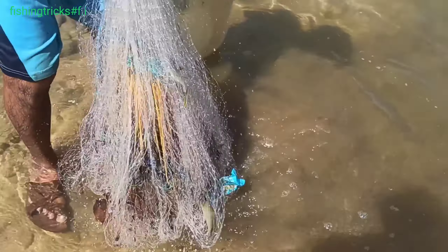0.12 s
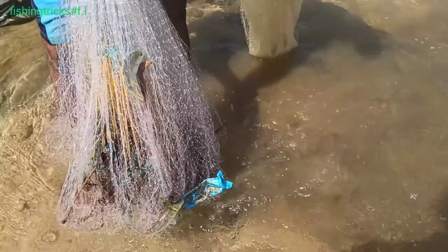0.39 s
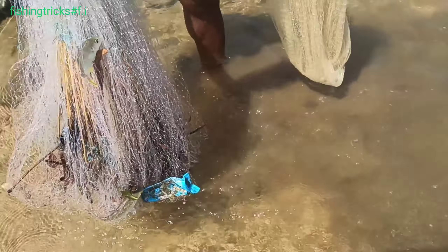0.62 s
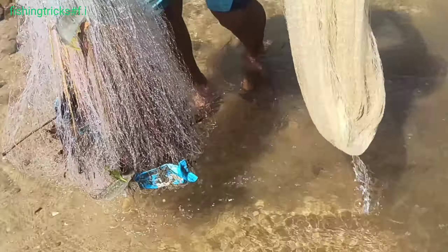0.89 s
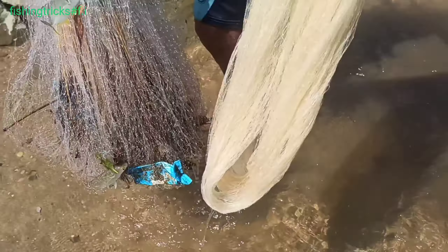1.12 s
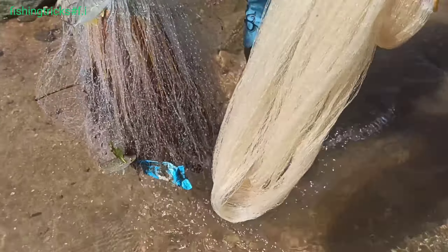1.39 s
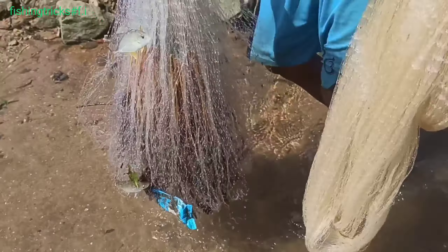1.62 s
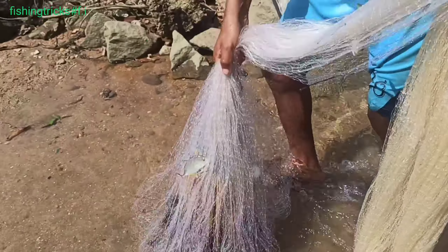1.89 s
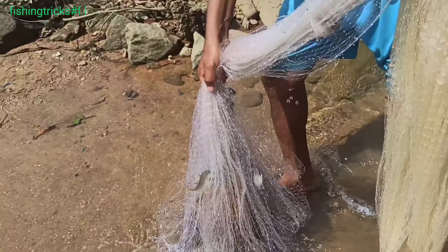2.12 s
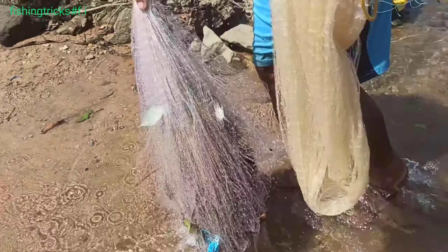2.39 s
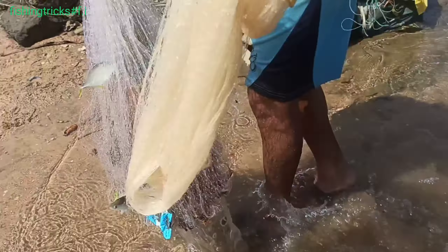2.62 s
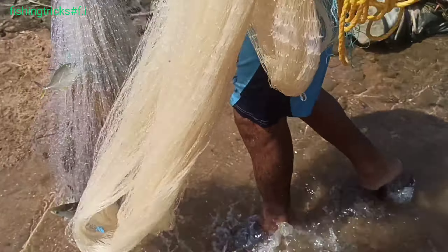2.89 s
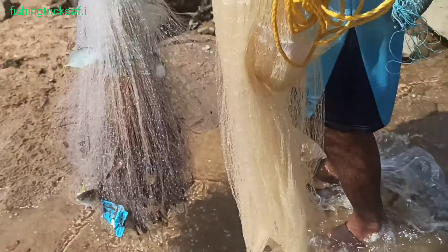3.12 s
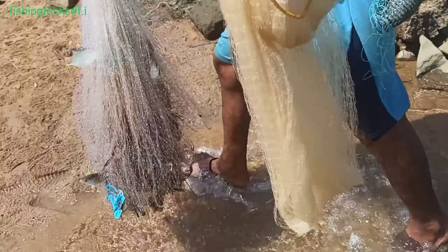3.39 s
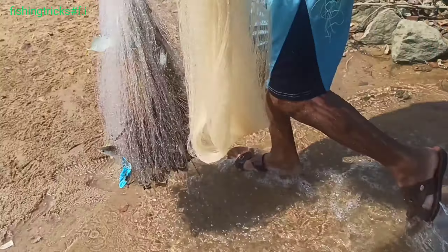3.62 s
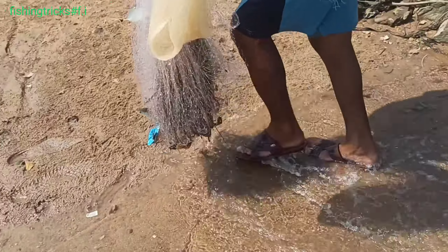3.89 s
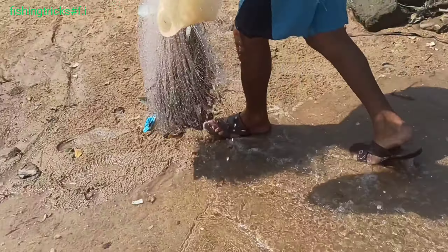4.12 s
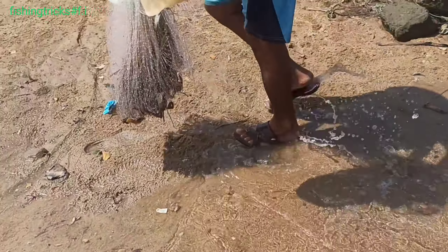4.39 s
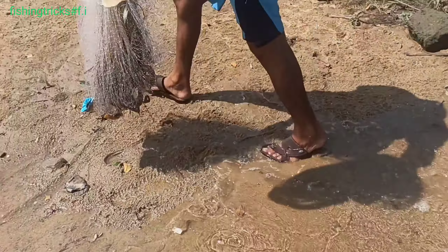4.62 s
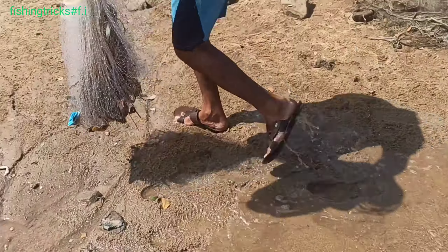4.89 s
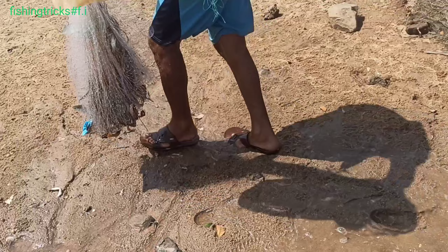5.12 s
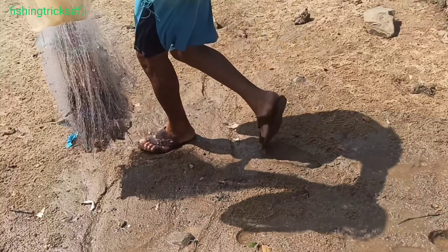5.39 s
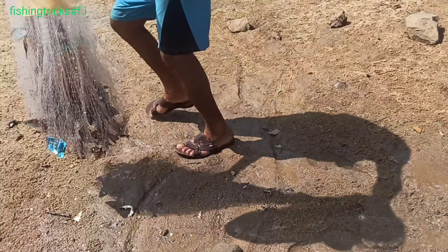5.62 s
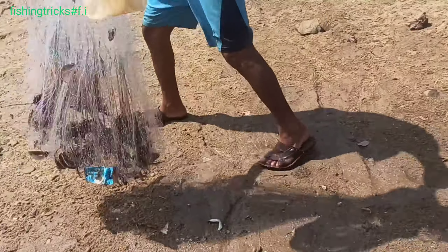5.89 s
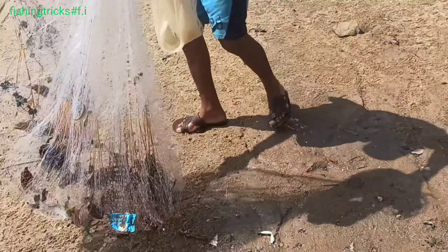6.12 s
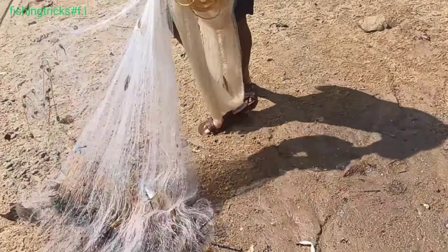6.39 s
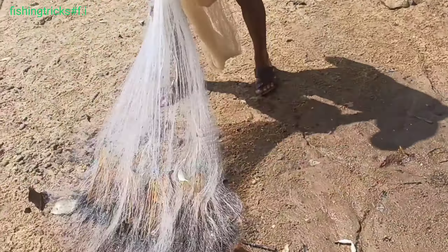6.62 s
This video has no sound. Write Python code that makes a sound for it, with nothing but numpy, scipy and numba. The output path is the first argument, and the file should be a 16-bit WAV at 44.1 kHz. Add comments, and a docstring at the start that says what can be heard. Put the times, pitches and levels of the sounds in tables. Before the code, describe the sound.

A close, bright stereo outdoor sound of a wet net leaving shallow water. From 0 to 1 second, thin trickle and spray, small ringing drops, a few sharp wet slaps and low wind thumps, mostly on the left. The water dips near 0.7, then swells into bubbly sloshing around 1.1 to 1.6. Between 1.7 and 2.5, heavy wind buffeting rumbles while splats and knocks break through. From 2.8 to 3.6, fuller wading splashes, gurgling bubbles rising in pitch, and spray leaning left. At 3.7 to 4.5, very hard short clacks and knocks, some on the right, with bright sandal slaps and quick splash surges. Around 5 to 5.3, more gliding bubbles and slosh, then thinner water with slaps at 5.7 and 6.1 to 6.2. From about 6.3 to 6.6, grainy mesh swishes and dull hem pats land on mud; last bubbles blip upward before 6.8.

```python
"""Wet net up a muddy bank

A wet fishing net is carried out of shallow water and up a muddy bank, close to a small stereo microphone.
Swarms of ringing bubbles make the slosh of wading feet, the splash, the fine spray and a thin top hiss.
Single ringing tones make drops, clacks, knocks and low thumps; some bubbles glide up in pitch.
Bursts of noise make sandals slapping the mud, the mesh swishing and the hem of the net clattering down.
Low noise, separate in each microphone port, makes the rumble of the wind."""
import sys
import numpy as np
from scipy import signal
from scipy.fft import rfft, irfft, next_fast_len
from scipy.io import wavfile
from numba import njit

SR = 44100
rng = np.random.default_rng(int(sys.argv[2]) if len(sys.argv) > 2 else 0)


def to_wav(s):
    """Save 16-bit WAV."""
    ch = np.atleast_2d(s).T  # columns
    pcm = np.round(np.clip(ch, -1, 1) * 32767)  # PCM
    wavfile.write(sys.argv[1], SR, pcm.astype(np.int16))


def invert_db(x):
    """Field ratio 10**(x/20) for x, a level in decibels (scalar or array-like)."""
    u = np.asarray(x, float) / 20
    return 10 ** u


N = 298192   # length in samples

# In all tables, left-right/dB is how much stronger the left port is than the right.
# Moving water, before surges: t/s, slosh level/dB, middle slosh pitch f/Hz, splash level/dB, spray level/dB
WATER = [(0.0, -41.5, 733, -37, -39.5), (0.22, -42, 920, -36.5, -35.5), (0.42, -44.5, 798, -46.5, -46.5),
         (0.66, -54, 588, -46, -45), (0.84, -49.5, 796, -48.5, -47.5), (1.13, -37, 934, -36, -37),
         (1.42, -33.5, 836, -31, -31), (1.65, -40, 666, -42, -44.5), (2.1, -38, 536, -34, -36.5),
         (2.43, -41, 704, -45.5, -43.5), (2.83, -30, 745, -29.5, -33.5), (3.02, -35.5, 730, -34, -35.5),
         (3.08, -31.5, 704, -34.5, -36.5), (3.5, -34, 635, -32.5, -34.5), (3.78, -38, 626, -37, -39.5),
         (4.1, -36, 687, -35.5, -35), (4.48, -34, 673, -33, -37), (4.74, -38, 867, -31.5, -35),
         (4.8, -39.5, 795, -37, -42), (4.97, -45.5, 714, -45.5, -46), (5.05, -33, 692, -42, -50),
         (5.13, -36.5, 703, -41.5, -39.5), (5.27, -35.5, 698, -34.5, -43.5), (5.65, -46.5, 821, -37.5, -43),
         (6.08, -48.5, 750, -47, -46), (6.36, -41.5, 836, -33.5, -34), (6.57, -41, 843, -33.5, -35.5),
         (6.61, -51, 870, -38, -42.5), (6.75, -43, 785, -35, -41.5)]
# Side of the splash, spray and hiss: t/s, left-right/dB, level of the top treble band against the spray/dB
SPRAY_PLACE = [(0.0, 0, -5.5), (1.41, 2, -6.5), (1.96, 3.5, -3.5), (2.4, 5.5, -9.5), (2.9, 6.5, -10.5),
               (3.55, 6.5, -11), (3.7, 0.5, -4), (4.2, -2, -6), (4.94, 3.5, -8), (5.21, 3, -5),
               (5.5, 1, -5), (6.1, 0.5, -8.5), (6.75, 0.5, -4.5)]
# Short splashes as a foot or the net hits the water: crest t/s, swell level/dB, fall time/s
SURGES = [(0.73, 4.5, 0.45), (1.801, 7, 0.11), (2.059, 6, 0.054), (3.346, 7.5, 0.069), (3.71, 4.5, 0.062),
          (3.85, 9.5, 0.057), (4.01, 9, 0.047), (5.24, 4.5, 0.032), (5.81, 7.5, 0.05), (6.39, 3.5, 0.076),]
SURGE_RISE_S = 0.059
SLOSH_SHARE = 0.69   # share of the swell in dB that the slosh takes
# Spectrum of water and splats through the microphone: f/Hz, level per Hz/dB
WATER_COLOUR = [(200, 16), (330, 9.5), (500, -1.5), (760, 2), (1100, 1), (1600, 0.5), (2500, -2), (4300, 2),
                (5000, -5), (5900, -5.5), (6500, 2), (7500, 1.5), (8400, -7.5), (11500, -10), (15500, -20)]
# Balance of the two ports for water and splats: f/Hz, left-right/dB
PORT_BALANCE = [(60, 2), (150, -0.5), (380, -5), (950, 2), (2380, -8), (5980, 3.5), (15000, -1)]

# Gusts on the ports: full strength t/s, hold/s, level at the port that is hit/dB, left-right/dB
GUSTS = [(0.094, 0.039, -27.5, 26), (0.24, 0.017, -33, 7), (0.61, 0.035, -30, -17),
         (0.72, 0.024, -25.5, 33), (0.907, 0.026, -31, -6), (1.09, 0.049, -31, 17), (1.695, 0.055, -24, 25),
         (1.842, 0.17, -23.5, 3.5), (1.95, 0.46, -22.5, 23), (3.1, 0.047, -34.5, 26),
         (3.485, 0.18, -34.5, 23), (3.82, 0.32, -32.5, -26), (4.425, 0.11, -26, 13),
         (6.402, 0.062, -36, -6)]
CALM_DB, GUST_RISE_DB_PER_S, GUST_FALL_DB_PER_S = -44.5, 151, 127

# Slaps and splats that throw spray: t/s, bright level/dB, left-right/dB, dull level against the bright/dB
SPLATS = [(0.0718, -16, -1, -30), (0.5278, -19, 1, -19), (1.126, -26.5, 9, 1), (1.816, -24, -3, -5),
          (1.937, -18.5, -1, -9), (2.031, -23.5, 2, -4), (2.151, -23.5, 0, -22), (2.3718, -22.5, 5, -26),
          (2.4593, -23.5, 4, -22), (2.635, -23.5, 9, -0.5), (3.179, -22.5, 3, -20), (3.462, -20, 7, -13),
          (3.796, -13.5, -7, -40), (3.993, -15.5, 2, -21), (4.664, -21.5, 7, -1), (5.7166, -19, 3, -7.5),
          (5.7739, -28, 3, 0), (6.1256, -17.5, 4, -7.5), (6.2274, -21, 4, -28)]
SPLAT_T60_S, SPLAT_RISE_S = 0.03, 0.00053

# Levels of the single tones below are those at the nearer port, before the onset swell and decay.
# Single drops, trapped bubbles and wet clacks: t/s, level/dB, f/Hz, time to fall 60 dB/s, left-right/dB
PLOPS = [(0.138, -24, 773, 0.077, -3.5), (0.269, -25, 1510, 0.046, -1), (0.351, -34, 1140, 0.045, 2),
         (0.4017, -18, 2090, .018, -4), (0.4707, -25.5, 1890, 0.035, -1), (0.524, -27, 2000, 0.026, -1),
         (0.5715, -21.5, 2670, 0.028, -14), (0.6455, -12.5, 2820, 0.012, -14),
         (0.6776, -25.5, 1950, 0.05, -10), (0.6902, -17, 2010, .024, 4), (0.8408, -21.5, 1660, 0.033, -3.5),
         (0.87, -28.5, 1370, 0.079, 3), (0.895, -28.5, 1610, 0.073, -2), (1.006, -20, 2140, 0.028, 0.5),
         (1.062, -22.5, 1050, 0.03, 0), (1.085, -17.5, 1034, 0.04, 3), (1.1272, -18.5, 1048, 0.087, 2),
         (1.1943, -18, 690, 0.037, -2), (1.228, -15.5, 2650, 0.04, -8), (1.273, -19.5, 666, 0.059, 1.5),
         (1.3246, -15, 3270, 0.013, 2), (1.428, -18.5, 820, 0.027, -2), (2.444, -20, 686, 0.03, -2.5),
         (2.472, -16.5, 1910, 0.014, 5), (2.566, -22.5, 343, 0.067, -1), (2.596, -11.5, 900, 0.0059, 1),
         (2.8074, -28, 426, 0.15, -3), (2.843, -15.5, 686, 0.027, 2), (2.97, -19.5, 945, 0.029, 7),
         (3.0505, -13, 740, 0.016, 1), (3.067, -15, 780, 0.015, -1), (3.16, -17, 525, 0.028, 0),
         (3.235, -23.5, 429, 0.17, -1), (3.3368, -9, 800, 0.0076, 3), (3.337, -16, 1246, 0.059, 16),
         (3.3684, -7, 3700, 0.0056, 8), (3.388, -24, 362, 0.23, -1), (3.7966, 21.5, 2470, 0.0015, -11),
         (3.996, -12.5, 3010, 0.017, -5), (4.0327, -8, 2800, 0.01, -11), (4.453, -18.5, 682, 0.083, -6),
         (4.6655, -0.5, 2520, 0.0037, -9), (4.7611, -8, 1750, 0.0041, -4), (4.8539, -20.5, 2710, .012, -10),
         (5.2315, -27, 306, 0.15, -1), (5.329, -14.5, 2670, 0.019, -17), (5.438, -12.5, 2780, 0.008, -3),
         (5.526, -25.5, 1370, 0.043, -2), (5.947, -26.5, 2070, 0.02, -8), (5.993, -29, 800, .04, 4),
         (6.2183, -24.5, 2070, 0.023, -14), (6.2288, -5.5, 3970, 0.0034, -12)]
# Knocks close to the right port: t/s, level/dB, f/Hz, time to fall 60 dB/s
KNOCKS = [(1.941, -9, 380, 0.033), (3.712, 1, 590, 0.0059), (3.735, 0.5, 404, 0.008),
          (3.8575, -4, 860, 0.014), (3.8754, 6, 1390, 0.0022), (4.145, 13.5, 318, 0.0027),
          (4.4967, 1, 360, 0.0088), (4.5348, 10.5, 1400, 0.0014), (5.165, -10.5, 3030, 0.0033),
          (6.1279, -1, 4270, 0.00071)]
KNOCK_PAN_DB = -32
# Single low thumps of air, stronger on one port: t/s, level/dB, f/Hz, left-right/dB
THUMPS = [(0.141, -2, 125, 32), (0.584, -15, 147, -20), (0.742, -5, 124, 24), (1.058, -14.5, 108, 19),
          (1.85, -9, 109, 7), (2.005, -8, 121, 10), (2.054, -8, 208, 14), (2.242, -7, 148, 19),
          (2.51, -8.5, 85, 29)]
THUMP_T60_S = 0.054
# Bubbles gliding up towards the surface: t/s, level/dB, birth f/Hz, f halfway through the ring/Hz,
# time to fall 60 dB/s
GLIDERS = [(.163, -29, 1250, 1550, 0.047), (0.28, -27, 1230, 1570, 0.085), (.302, -26, 2250, 2600, 0.029),
           (.404, -21.5, 2310, 3180, 0.017), (.451, -31, 1230, 1890, 0.04), (0.914, -35, 1710, 1790, 0.14),
           (1.012, -25, 650, 990, 0.054), (1.142, -22, 695, 740, 0.065), (1.166, -23, 930, 1040, 0.092),
           (1.296, -14, 500, 600, 0.026), (1.395, -26.5, 560, 845, 0.12), (1.395, -12.5, 3480, 3530, 0.011),
           (1.498, -19, 735, 790, 0.034), (2.0686, 3.5, 710, 970, 0.014), (2.749, -18, 980, 1250, 0.031),
           (3.115, -18, 570, 794, 0.062), (3.19, -18.5, 327, 350, 0.09), (3.26, -20, 520, 864, 0.11),
           (3.398, -18, 636, 765, 0.048), (3.52, -26.5, 321, 357, 0.22), (4.74, -20, 677, 724, .04),
           (5.014, -22.5, 1300, 2520, 0.027), (5.033, -18.5, 624, 1040, 0.044),
           (5.048, -22, 570, 754, 0.056), (5.225, -19, 577, 637, 0.044), (5.262, -14, 633, 895, 0.061),
           (5.311, -24, 2320, 2630, 0.021), (6.105, -26.5, 655, 950, .045), (6.278, -22, 500, 860, 0.044),
           (6.659, -25.5, 1310, 1350, .03), (6.702, -23, 1217, 1330, 0.044),
           (6.715, -11.5, 1580, 2700, 0.012), (6.742, -17, 526, 610, 0.02)]

# The mesh swishes over the mud: t/s, level before the grain/dB
SWISH = [(6.24, -71), (6.38, -33), (6.44, -40), (6.58, -41), (6.6, -70)]
SWISH_HZ = 3670   # middle of the band
# The hem of the net clatters down on the mud: t/s, level before the left-right split/dB
HEM_TICKS = [(6.342, -28), (6.434, -25), (6.443, -27), (6.469, -25), (6.483, -23), (6.519, -23),
             (6.559, -22.5), (6.581, -24.5)]
HEM_T60_S, HEM_LOW_HZ, HEM_HIGH_HZ, HEM_PAN_DB = 0.016, 450, 1700, -4


def amp_pair(pan_db):
    """Left and right gains that make a left-right difference."""
    return invert_db(np.array([pan_db, -pan_db]) / 2)


def rms_one(x):
    """Scale a sound to rms 1."""
    return x / np.sqrt(np.mean(x ** 2) + 1e-20)


def in_time(rows):
    """Draw straight lines between the rows of a table, sample by sample."""
    s, *columns = np.transpose(rows)
    t = np.arange(N) / SR
    return [np.interp(t, s, column) for column in columns]


def at_hz(points, hz):
    """Read a spectrum table on a log-frequency axis."""
    point_hz, db = np.transpose(points)
    return np.interp(np.log(hz + 1), np.log(point_hz), db)


def drift(rate_hz, channels=1):
    """Slow random wander of rms 1: noise smoothed by two equal low-pass poles."""
    step = 40   # samples between drawn points
    pole = np.exp(-2 * np.pi * rate_hz * step / SR)
    noise = rng.standard_normal((channels, N // step + 2002))
    slow = signal.lfilter([1], [1, -2 * pole, pole * pole], noise)[:, 2000:]   # skip the settling
    place = np.arange(N) / step
    return np.array([np.interp(place, np.arange(len(v)), rms_one(v)) for v in slow])


def band(x, low_hz, high_hz, order=2):
    """Butterworth band-pass."""
    edges = [low_hz, min(high_hz, 0.45 * SR)]
    return signal.sosfilt(signal.butter(order, edges, "band", fs=SR, output="sos"), x)


def coloured(x):
    """Give flat stereo sound the water's spectrum and the ports' balance."""
    size = next_fast_len(N)
    hz = np.arange(size // 2 + 1) * SR / size
    gain = invert_db(at_hz(WATER_COLOUR, hz)) * amp_pair(at_hz(PORT_BALANCE, hz))
    return irfft(rfft(x, size) * gain, size)[:, :N]


@njit
def add_rings(out, start, hz, height, t60, rise, pan_db, lag, swell_cycles, sr):
    """Add damped sines that swell, die and climb in pitch; the ports differ in level and arrival time."""
    for k in range(len(start)):
        fall = np.log(1000) / (t60[k] * sr)
        swell = hz[k] / (swell_cycles * sr)
        for side in range(2):
            sign = 1 - 2 * side   # left +1, right -1
            gain = height[k] * 10 ** (min(0, sign * pan_db[k]) / 20)   # only the far port is weakened
            first = start[k] + sign * lag[k] / 2
            begin = max(int(first) + 1, 0)
            end = min(int(first + t60[k] * sr) + 2, out.shape[1])
            for i in range(begin, end):
                t = i - first   # in samples
                shape = np.exp(-fall * t) * (1 - np.exp(-swell * t))
                cycles = hz[k] / sr * t * (1 + rise[k] * fall * t)
                out[side, i] += gain * shape * np.sin(2 * np.pi * cycles)


def bubbles(per_s, mid_hz, octaves, cycles, size_db, clump_db, bed_db, lag_samples):
    """A random swarm of ringing bubbles round a middle pitch, over a bed of countless far ones; rms 1."""
    chance = per_s * invert_db(clump_db * drift(14)[0]) / SR   # bubbles come in clumps
    start = np.flatnonzero(rng.random(N) < chance)
    pitch_a, size, ring, pitch_b, side, delay = rng.random((6, len(start)))
    hz = (mid_hz * np.ones(N))[start] * 2 ** (octaves * (pitch_a + pitch_b - 1) / 2)
    height = hz * invert_db(-size_db * np.log(size + 0.022))   # few strong and many weak
    t60 = cycles * (0.34 + ring) / hz
    rise = 0.045 * ring ** 2   # longer rings climb more
    pan_db = 12 * (side - 0.5)
    lag = lag_samples * (2 * delay - 1)
    near = np.zeros((2, N))
    add_rings(near, start * 1., hz, height, t60, rise, pan_db, lag, 2.5, SR)

    low_hz, high_hz = np.mean(mid_hz) * 2 ** (octaves * np.array([-0.42, 0.42]))
    shared, own = rng.standard_normal(N), rng.standard_normal((2, N))
    bed = rms_one(band(1.01 * shared + own, low_hz, high_hz) * invert_db(2.4 * drift(35)))
    return rms_one(coloured(rms_one(near) + invert_db(bed_db) * bed))


def moving_water():
    """Large bubbles slosh, middling ones splash, small ones fizz off the mesh; a thin top hiss follows them."""
    slosh_db, slosh_hz, splash_db, spray_db = in_time(WATER)
    pan_db, hiss_db = in_time(SPRAY_PLACE)
    t = np.arange(N) / SR
    swell_db = np.zeros(N)
    for crest, db, fall in SURGES:
        swell_db += np.interp(t, [crest - SURGE_RISE_S, crest, crest + fall], [0, db, 0])

    slosh = bubbles(320, slosh_hz, octaves=2.2, cycles=40,
                    size_db=3.5, clump_db=3.5, bed_db=-7, lag_samples=10.7)
    splash = bubbles(1200, 2485, octaves=2.392, cycles=44,
                     size_db=3.5, clump_db=2, bed_db=-4.5, lag_samples=8.5)
    spray = bubbles(2500, 7780, octaves=1.0, cycles=29.0,
                    size_db=5.5, clump_db=3, bed_db=-4.5, lag_samples=2.24)
    top_hiss = bubbles(2000, 14000, octaves=0.75, cycles=16,
                       size_db=4.5, clump_db=3, bed_db=-3, lag_samples=0.7)

    surge = invert_db(swell_db + 1.83 * drift(25))   # splash, spray and top hiss swell together
    bright = invert_db(splash_db) * splash + invert_db(spray_db) * (spray + invert_db(hiss_db) * top_hiss)
    return invert_db(slosh_db + SLOSH_SHARE * swell_db) * slosh + surge * amp_pair(pan_db) * bright


def gust_db():
    """Wind level at each port: gusts rise, hold and fall over a calm floor, adding as powers."""
    t = np.arange(N) / SR
    power = np.full((2, N), invert_db(CALM_DB) ** 2)
    for s, hold, db, pan_db in GUSTS:
        before_db = GUST_RISE_DB_PER_S * np.maximum(s - t, 0)
        after_db = GUST_FALL_DB_PER_S * np.maximum(t - s - hold, 0)
        port_db = np.minimum([[pan_db], [-pan_db]], 0)   # only the other port is weakened
        power += invert_db(db - before_db - after_db + port_db) ** 2
    return 10 * np.log10(power)


def wind():
    """Lumpy low noise of its own in each port; stronger gusts reach higher in pitch."""
    db = gust_db()
    edge_hz = 175 * invert_db(0.055 * (db.max(axis=0) + 33.0))
    lumps = rng.standard_normal((2, N)) * invert_db(4.4 * drift(33, channels=2))
    rumble, state = np.zeros((2, N)), np.zeros((2, 2, 2))
    for i in range(0, N, 1024):   # a new upper edge for each short block
        sos = signal.butter(3, np.clip(edge_hz[i], 60, 900), fs=SR, output="sos")
        rumble[:, i:i + 1024], state = signal.sosfilt(sos, lumps[:, i:i + 1024], zi=state)
    rumble = signal.sosfilt(signal.butter(5, 73, "high", fs=SR, output="sos"), rumble)
    return rms_one(rumble / np.sqrt(edge_hz)) * invert_db(db)   # a wider band must not be louder by itself


def even(burst, shape):
    """Scale a stereo burst so that it counts as rms 1 under the given envelope."""
    return burst * np.linalg.norm(shape) / np.sqrt(np.sum((burst * shape) ** 2) / 2)


def splats():
    """Bursts of spray noise that swell within a moment and die fast, bright and dull parts apart."""
    noise = rng.standard_normal(N) + 0.54 * rng.standard_normal((2, N))
    ragged = invert_db(3 * rng.standard_normal(N // 40 + 1)).repeat(40)[:N]   # droplets land unevenly
    noise = coloured(noise * ragged)
    bright, dull = rms_one(band(noise, 6360, 13000)), rms_one(band(noise, 550, 3900))
    t = np.arange(round(SPLAT_T60_S * SR)) / SR
    shape = invert_db(-60 * t / SPLAT_T60_S) * np.minimum(t / SPLAT_RISE_S, 1)
    out = np.zeros((2, N))
    for s, db, pan_db, dull_db in SPLATS:
        start = round(s * SR)
        span = slice(start, start + len(t))
        burst = even(bright[:, span], shape) + invert_db(dull_db) * even(dull[:, span], shape)
        out[:, span] += invert_db(db) * amp_pair(pan_db)[:, None] * shape * burst
    return out


def plops():
    """Each drop rings one bubble; the shortest rings are mere clacks and knocks, the lowest are thumps."""
    knocks = [(*knock, KNOCK_PAN_DB) for knock in KNOCKS]
    thumps = [(s, db, hz, THUMP_T60_S, pan_db) for s, db, hz, pan_db in THUMPS]
    s, db, hz, t60, pan_db = np.transpose([*PLOPS, *knocks, *thumps])
    rise = np.full(len(s), 0.0095)   # pitch climbs by twice this share while the ring falls to 1/e
    lag = -0.15 * pan_db             # in samples: the far port hears it later
    out = np.zeros((2, N))
    add_rings(out, s * SR, hz, invert_db(db), t60, rise, pan_db, lag, 0.15, SR)
    return band(out, 100, 19000)     # small bodies push little bass


def gliders():
    """Centred bubbles that swell for a few cycles and sweep up in pitch while they ring."""
    s, db, hz, later_hz, t60 = np.transpose(GLIDERS)
    rise = (later_hz / hz - 1) / np.log(1000)
    centre = np.zeros(len(s))   # no difference in level or arrival time
    out = np.zeros((2, N))
    add_rings(out, s * SR, hz, invert_db(db), t60, rise, centre, centre, 2.75, SR)
    return out


def bank_echo(x, db, t60):
    """Rocks, legs and ripples scatter a short, dull smear after each single drop, knock or bubble."""
    t = np.arange(round(t60 * SR)) / SR
    fading = rng.standard_normal((2, len(t))) * invert_db(-60 * t / t60) * (t > 0.003)
    scatter = band(fading, 230, 4000)
    return invert_db(db) * signal.fftconvolve(x, scatter / np.linalg.norm(scatter[0]), axes=1)[:, :N]


def swish():
    """The mesh on the mud: grainy bright noise an octave wide."""
    level_db = np.interp(np.arange(N) / SR, *np.transpose(SWISH), left=-np.inf, right=-np.inf)
    noise = rng.standard_normal(N) + rng.standard_normal((2, N))
    bright = rms_one(band(noise, SWISH_HZ / np.sqrt(2), SWISH_HZ * np.sqrt(2)))
    return invert_db(level_db + 3.5 * drift(120)) * bright


def hem():
    """The hem on the mud: short dull pats of noise, much alike in both ports."""
    clicks = np.zeros(N)
    s, db = np.transpose(HEM_TICKS)
    clicks[(s * SR).astype(int)] = invert_db(db)
    t = np.arange(round(HEM_T60_S * SR)) / SR
    envelope = signal.fftconvolve(clicks, invert_db(-60 * t / HEM_T60_S))[:N]
    noise = rng.standard_normal(N) + 0.98 * rng.standard_normal((2, N))
    dull = rms_one(band(noise, HEM_LOW_HZ, HEM_HIGH_HZ))
    return amp_pair(HEM_PAN_DB)[:, None] * dull * envelope


def scene():
    """Water, wind, slaps, drops with their echo, and the net's mesh and hem, in the open air."""
    water_and_wind = moving_water() + wind()
    slaps = splats()
    drops = plops() + gliders()
    echo = bank_echo(drops, db=-21.5, t60=0.06)
    net = swish() + hem()
    return water_and_wind + slaps + drops + echo + net


def top_cut(x):
    """Nothing passes above the cut-off."""
    return signal.sosfilt(signal.butter(12, 16350, fs=SR, output="sos"), x)


def record(dry):
    """Almost nothing is left at 9-11 kHz or above 16 kHz; peaks clip at full scale."""
    gap = signal.cheby2(8, 60, [8900, 11300], "bandstop", fs=SR, output="sos")
    top = signal.cheby2(16, 50, 16150, fs=SR, output="sos")
    heard = signal.sosfilt(np.vstack([gap, top]), dry)
    mix = np.clip(heard, -1, 1)
    return top_cut(mix)


dry = scene()
out = record(dry)
to_wav(out)
```